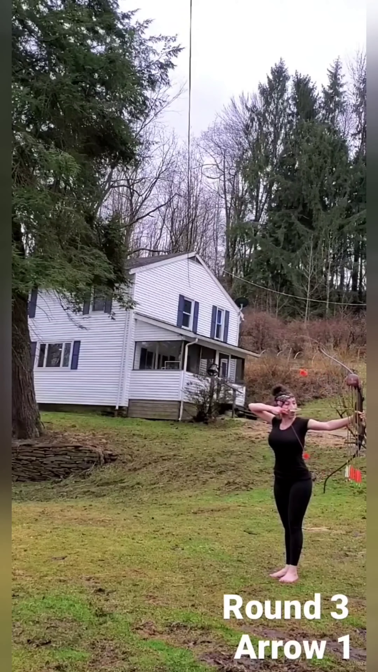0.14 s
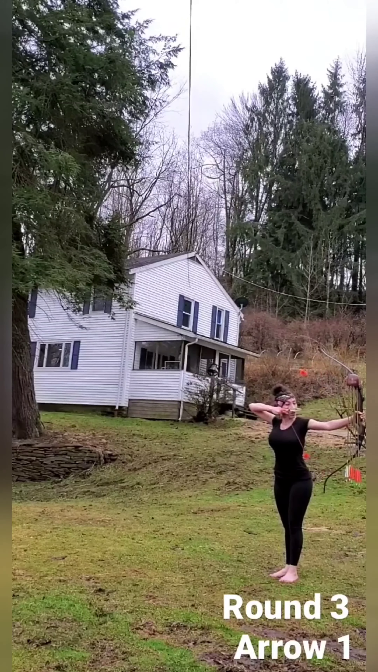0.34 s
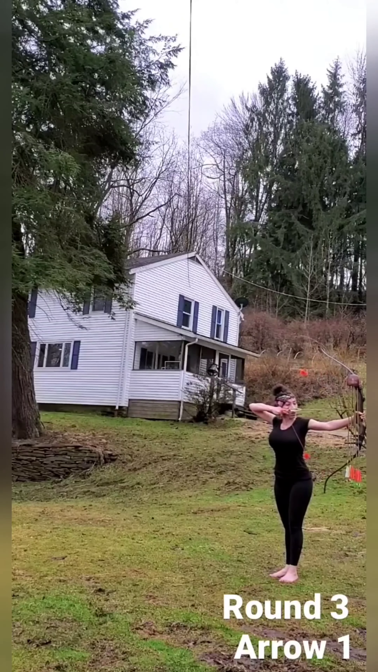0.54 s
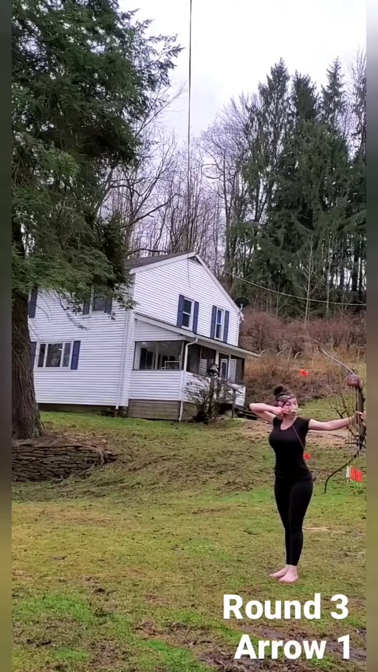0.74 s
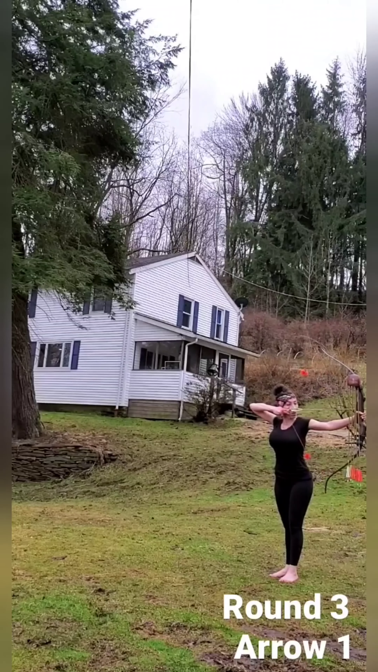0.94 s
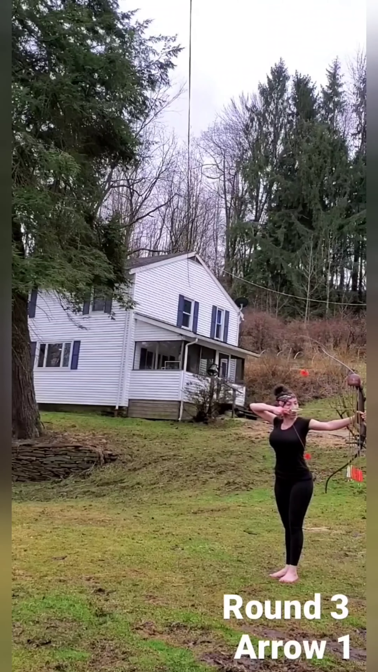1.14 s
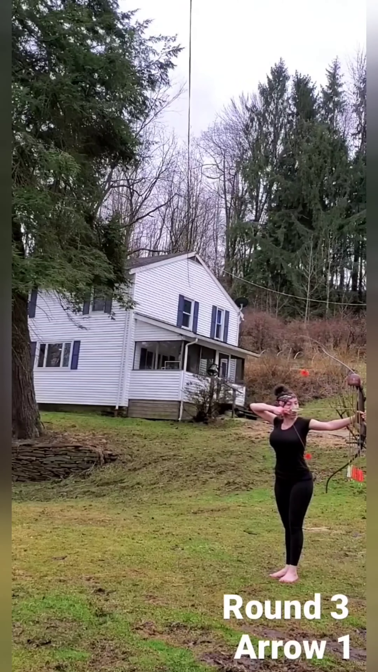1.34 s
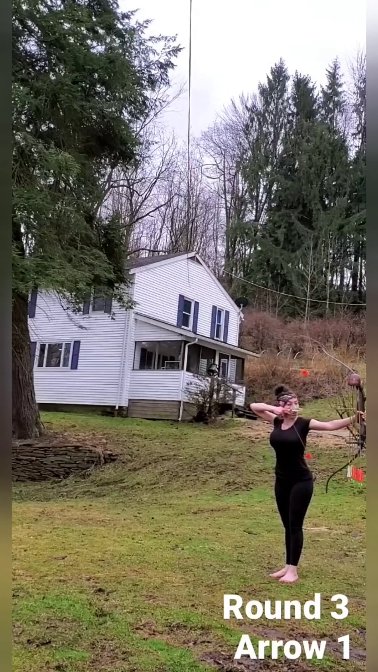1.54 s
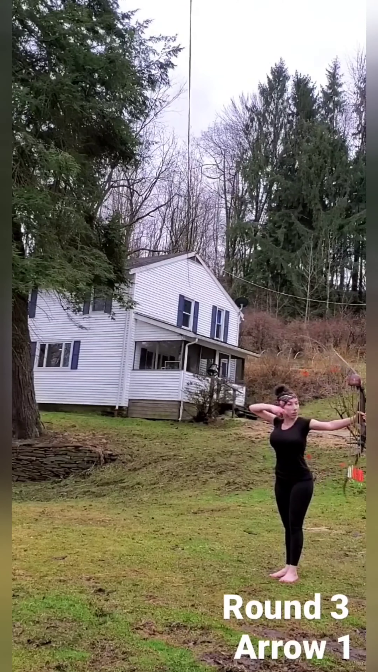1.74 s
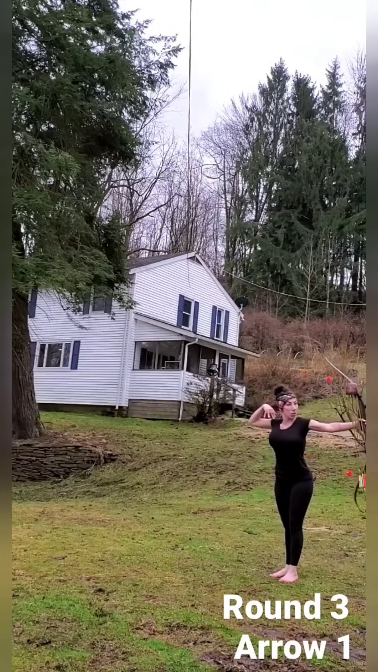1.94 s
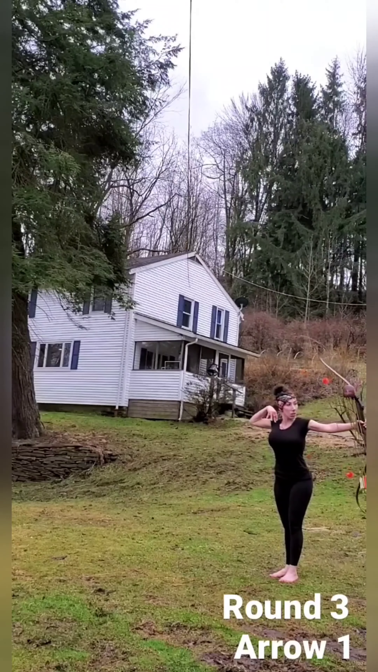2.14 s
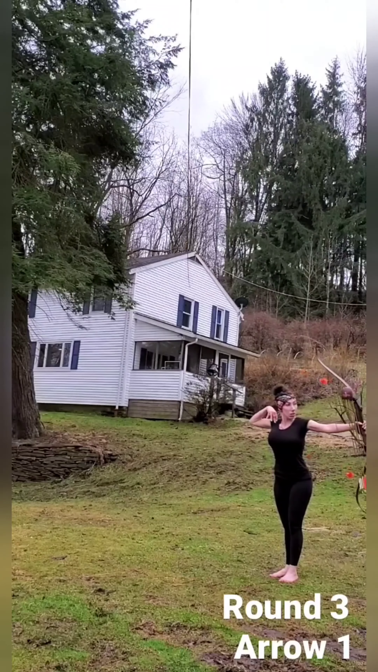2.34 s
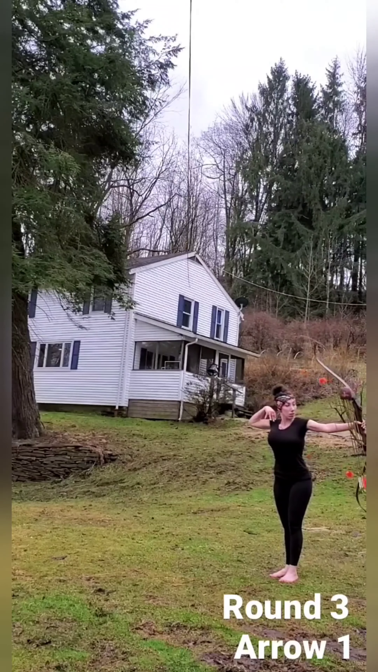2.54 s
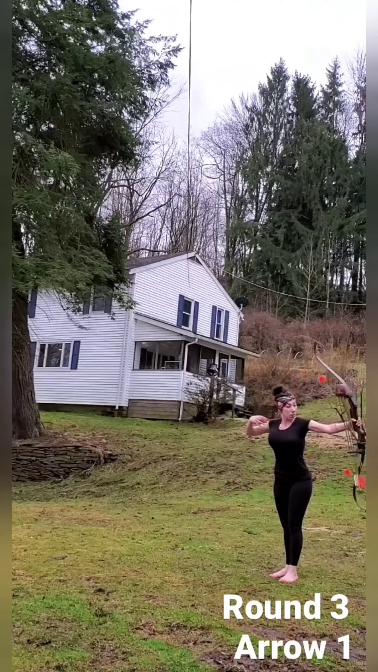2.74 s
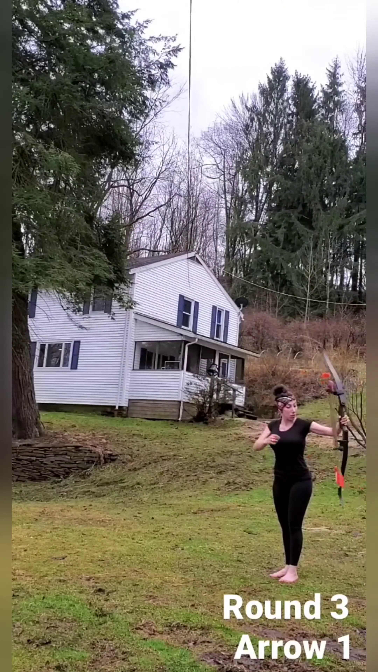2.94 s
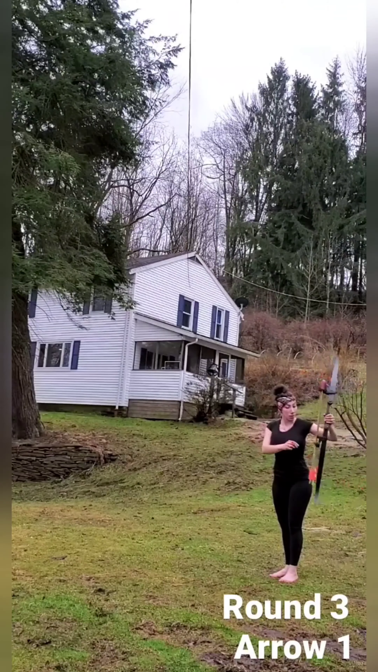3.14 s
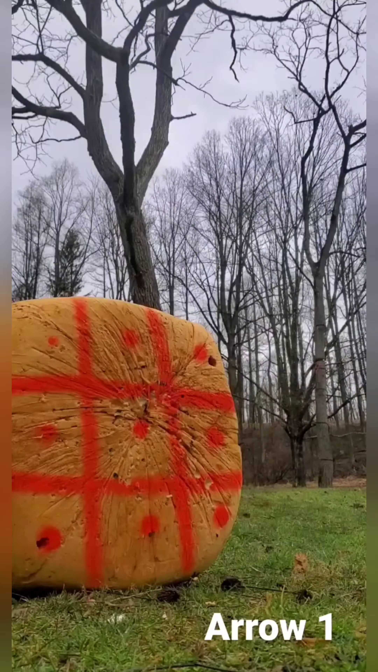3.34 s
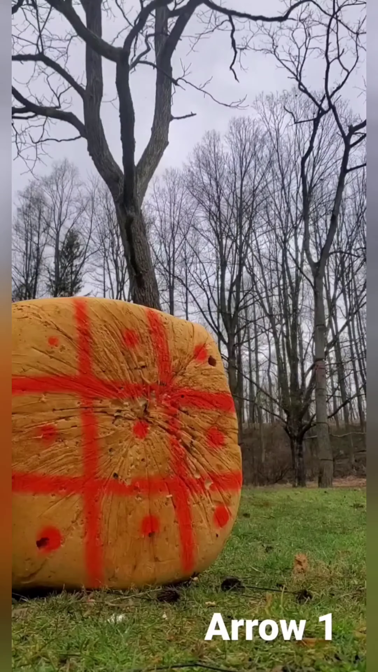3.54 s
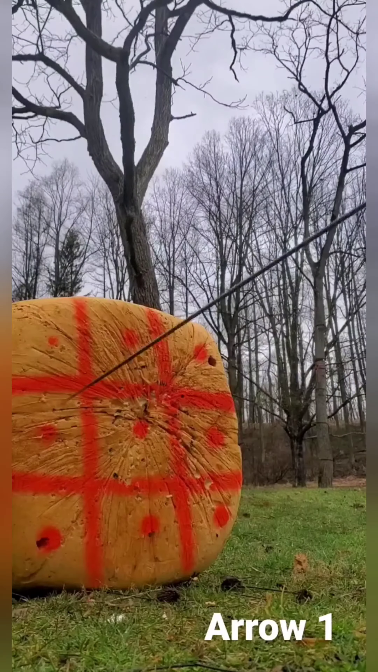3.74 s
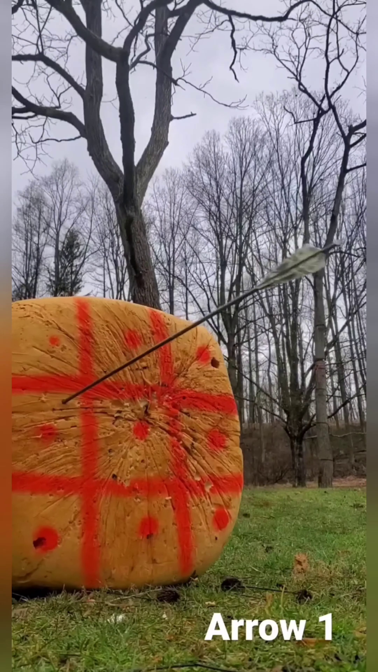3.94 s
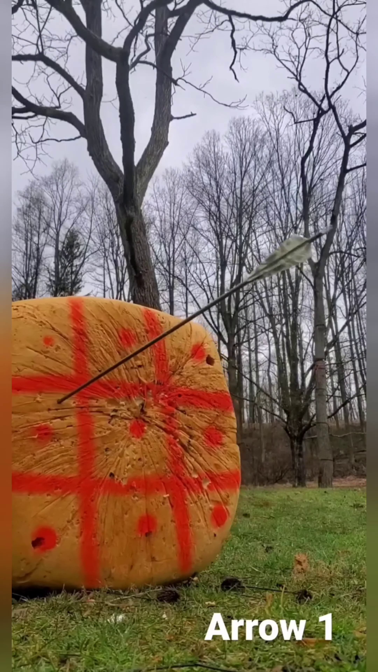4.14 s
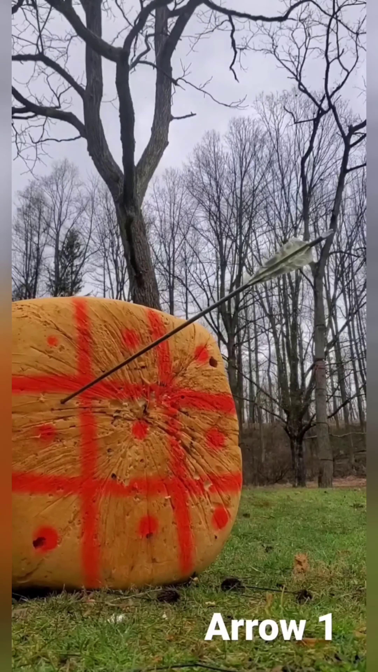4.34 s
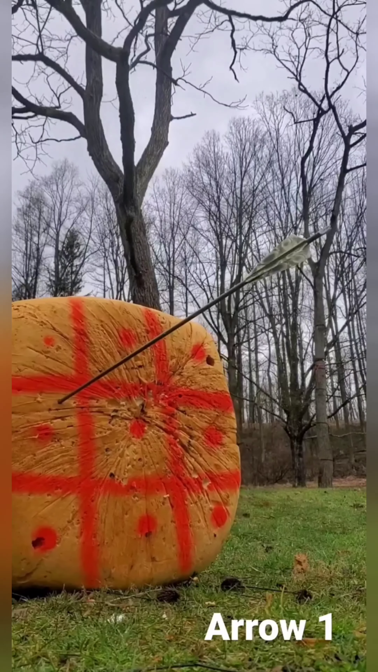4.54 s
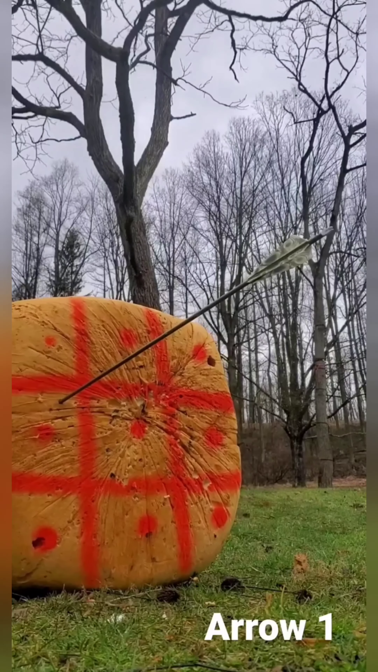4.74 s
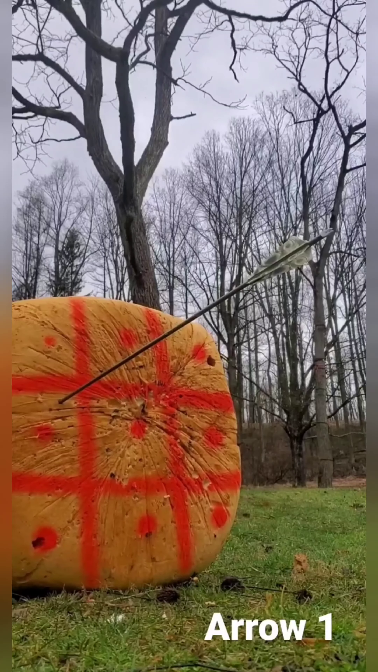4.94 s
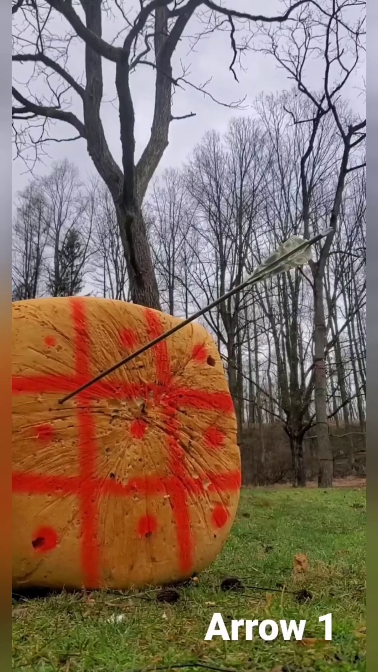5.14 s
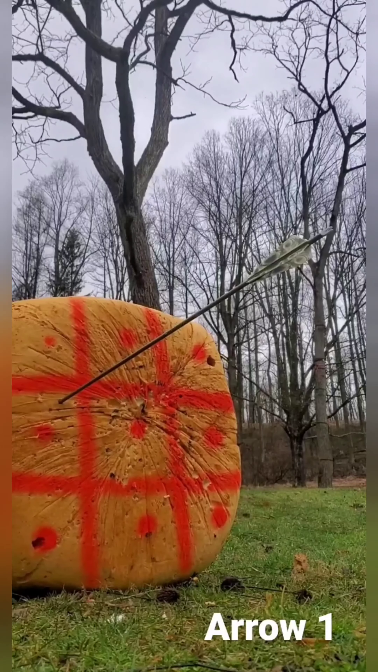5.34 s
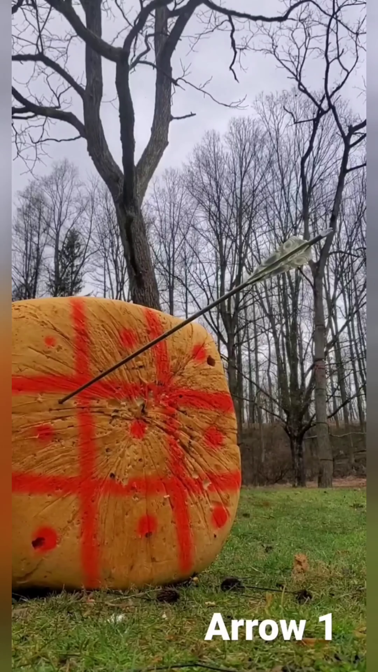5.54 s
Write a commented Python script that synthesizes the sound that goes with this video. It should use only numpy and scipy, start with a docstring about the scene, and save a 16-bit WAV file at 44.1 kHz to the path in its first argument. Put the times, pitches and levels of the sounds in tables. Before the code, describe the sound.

A quiet yard opens with low wind buffeting both sides, then mostly the right, strongest around 1.7 to 1.85 seconds. Faint, blurred bird calls fade in the first half second while a small whistled phrase with a higher flick repeats about four times a second until 1.3. At 1.81 a bowstring slaps twice, dry and woody, and the arrow hisses away with light rattling clicks around 2.0. A soft, dull foam thud lands at 2.32, with thin high chirps nearby. Wind swells on the left before a hard cut at 3.3 and a tiny silence. From 3.35 the sound is beside the target: a faint caw at 3.5, a sharp snap at 3.73, a very brief hiss, then a loud cracking thud at 3.84, tearing foam, left-heavy. A short boom and echoes die away under rumbling left-side wind, sparse ticks and faint leaves until about 5.7.

```python
"""A bow is shot: modes of bow and string ring, the arrow hisses off and thuds into a foam target.
After a hard cut and a short silence a second shot is heard from beside the target.
Blows drive decaying modes; slaps, tearing foam and moving air are shaped noise; sparse taps echo them.
Behind lie far birds made of blurred tones and a caw, stirring leaves and a steady yard murmur.
Wind noise buffets each microphone port on its own; the right port is duller and shaded."""
import sys
import numpy as np
from scipy import signal
from scipy.fft import rfft, irfft, next_fast_len
from scipy.io import wavfile
from scipy.ndimage import uniform_filter1d

SR = 44100
rng = np.random.default_rng(int(sys.argv[2]) if len(sys.argv) > 2 else 0)


def dump_mix(stems):
    """Bounce the given channels to the path in sys.argv[1] as a 16-bit WAV at rate SR."""
    frames = np.atleast_2d(stems).T  # one column per channel
    limited = np.clip(frames, -1, 1)  # hard clip at full scale
    pcm = np.round(limited * 32767).astype(np.int16)
    wavfile.write(sys.argv[1], SR, pcm)


N = 251369

# Source levels are those before the gain of record(). A "shade" is how many dB weaker the right port is,
# before its own colouring. A width in octaves runs from the centre to the -6 dB point on either side.

# Modes of the bow. Each row: frequency in Hz, level in dB, t60 in seconds.
BOW_MODES = [(149.8, -1, 0.31), (210.4, 4.5, 0.041), (393, -1, 0.073), (480, -7, 0.12), (694, -3, 0.084),
             (1330, -16.5, .12)]
# Modes of the target. Each row: frequency in Hz, level in dB, t60 in seconds.
TARGET_MODES = [(169, -5.5, 0.068), (216.1, -6, .24), (276.6, -8, 0.092), (358.4, -18.5, 0.28),
                (378.7, -0.5, 0.078), (446, -15.5, 0.14), (557, -15, 0.078), (574.7, 4, 0.035),
                (643, -17, 0.089), (780, -10.5, .02), (955, -2.5, 0.012), (1260, -17, 0.0085)]
# Modes of the arrow tip. Each row: frequency in Hz, level in dB, t60 in seconds.
TIP_MODES = [(600, -1, 0.024), (1223, -10, 0.015), (2876, -7, 0.005), (3940, 1.5, 0.005),
             (6260, -8.5, 0.0046), (10500, -13, 0.0067)]
# Pushes into the bow. Each row: time in seconds, level in dB, contact in ms, shade in dB.
BOW_PUSHES = [(1.8095, -42, 0.78, 1), (1.826, -35.5, 2.2, -6), (3.7205, -40, .6, 14.5),
              (3.7385, -29, 0.95, 13), (3.7445, -39, 1.9, 14)]
# Blows on the target. Each row: time in seconds, level in dB, contact in ms, shade in dB.
TARGET_BLOWS = [(2.3212, -25.5, 0.88, 7.3), (2.3275, -17.5, 3, 1.6), (2.3345, -21, 0.81, 2.8),
                (2.378, -28.5, 2.2, 2.3), (3.8382, -20, 0.17, 13), (3.8445, -24, 0.44, 18),
                (3.847, -24.5, 4, 10), (3.8497, -3, 0.58, 12.6), (3.8745, -20.5, 0.67, 8.3)]
# Blow on the arrow tip. Each row: time in seconds, level in dB, contact in ms, shade in dB.
TIP_BLOWS = [(3.8378, -8, 0.055, 16.5)]

# String slaps, two for each shot. Each row: time in seconds, knock level in dB, crack level in dB,
# crack centre in Hz, crack t60 in seconds, zing level in dB, shade in dB.
STRING_SLAPS = [(1.808, -39, -35.5, 2780, 0.086, -72, 0), (1.8246, -36.5, -26.5, 2820, 0.041, -36, 4),
                (3.7235, -39.5, -37.5, 2996, .025, -59.5, 12.5),
                (3.731, -45.5, -32.5, 3500, .05, -35.5, 12.5)]
# Bands of a slap: centre in Hz, width in octaves, t60 in seconds.
KNOCK, ZING = (480, 1.3, 0.071), (9700, 0.36, 0.029)
CRACK_OCTAVES = 0.85

# Air past the fletching, one list for each shot. Each row: time in seconds, level in dB, centre in Hz.
FLIGHT_PATHS = [
    [(1.83, -37, 2170), (1.88, -47.5, 2640), (1.978, -51, 3100), (1.995, -51.5, 3980), (2.045, -51.5, 3550),
     (2.11, -55.5, 3330), (2.17, -66, 3240), (2.32, -78, 4840)],
    [(3.74, -44.5, 3000), (3.8, -56, 4000), (3.825, -49.5, 5500), (3.838, -58, 4340)],
]
# Width of the hiss in octaves, one entry for each shot.
FLIGHT_WIDTHS = [0.81, 1.3]
# Shade of the hiss in dB, one entry for each shot.
FLIGHT_SHADES = [6, 11.5]
PATCHY_DB, RATTLE_DB = 3.5, 2.8  # rms spread over time and frequency, and over time alone

# Foam tearing round the tip. Each row: time in seconds, level in dB, centre in Hz, shade in dB.
FOAM_TEARS = [(2.321, -39.5, 1480, -2.5), (2.323, -42.5, 2200, -4.5), (2.322, -47.5, 6000, -4),
              (3.838, -21.5, 800, 6), (3.838, -21.5, 3080, 11), (3.842, -21, 3480, 10),
              (3.846, -31, 4000, 18), (3.848, -40, 6000, 6.5)]
TEAR_T60_S, TEAR_OCTAVES = 0.029, 0.73
# Small clicks, most from the rattling shaft. Each row: time in seconds, level in dB, centre in Hz,
# t60 in seconds, shade in dB.
SMALL_CLICKS = [(1.913, -56, 3000, .04, -21), (1.985, -43.5, 4600, 0.031, -11), (1.992, -38, 4700, .05, -3),
                (2.035, -45.5, 3060, 0.055, 8), (2.081, -56, 5500, .03, -2), (2.111, -57, 3040, .03, 8),
                (3.7515, -46, 6000, .015, 14.5), (3.774, -49.5, 3955, .025, 11.5),
                (3.79, -56, 4200, .02, 12), (3.878, -59, 6320, 0.011, 16),
                (3.906, -54.5, 4510, 0.019, 13.5), (3.975, -57, 2500, 0.028, 17.5),
                (4.259, -64, 1190, .03, 10.5), (5.192, -69, 3200, 0.022, 15.5),
                (5.607, -62.5, 4000, 0.11, 23.5)]
CLICK_OCTAVES = 0.47
# Rumble and hiss after each shot and hit. Each row: time in seconds, boom level in dB,
# middle level in dB, treble level in dB, top level in dB, shade in dB.
ROLL_LEVELS = [(1.83, -50, -45.5, -56.5, -56.5, 6), (2.335, -33.5, -57, -67.5, -70.5, 4.5),
               (3.735, -36.5, -57.5, -62.5, -61.5, 11.5), (3.865, -29.5, -54.5, -57, -66.5, 10.5)]
# Boom, middle, treble and top bands. Each row: centre in Hz, width in octaves, t60 in seconds.
ROLL_BANDS = [(233.5, 0.83, .4), (950, 0.88, .55), (2400, 1.0, .55), (9000, .45, .4)]
RAGGED_DB = 2.2  # rms wavering of every noise burst

# Decay of the echoes from trees and walls. Each row: frequency in Hz, t60 in seconds.
ECHO_DECAY = [(150, 0.99), (400, 0.2), (1000, 0.1), (2300, .7), (4000, 0.25), (8000, 0.53)]
THUD_ECHO_DB, CRACK_ECHO_DB, SONG_ECHO_DB = -22, -25.5, 1.5

# Far notes outside the phrase. Each row: start in seconds, length in seconds, first frequency in Hz,
# last frequency in Hz, level in dB, blur in Hz, shade in dB.
FAR_NOTES = [(1.129, 0.061, 5870, 6040, -70.5, 300, 3), (1.15, 0.12, 6260, 6130, -74, 150, 16),
             (2.244, 0.092, 10130, 10840, -78.5, 595, 2), (2.426, 0.088, 10300, 10520, -78, 880, 3),
             (2.505, 0.12, 10640, 10390, -75.5, 450, 2), (2.744, 0.092, 9440, 9450, -77.5, 795, 6),
             (5.2, 0.07, 3382, 3255, -87.5, 497.5, 9), (5.44, 0.063, 2262, 2074, -88, 300, 2.5)]
# One phrase repeated about four times a second. Each row: start in seconds, held length in seconds, level in dB.
PHRASES = [(0.172, 0.077, -83.5), (0.402, 0.1, -71), (0.643, .135, -74.5), (.9, 0.16, -71),
           (1.14, .17, -76)]
HELD_HZ, HELD_END_HZ, HELD_BLUR_HZ, HELD_SHADE_DB = 2120, 2220, 85, 14
# a higher flick starts part way through the held note: fraction of it, seconds, dB relative to it
FLICK_AT, FLICK_S, FLICK_DB = 0.52, 0.085, -7
FLICK_HZ, FLICK_END_HZ, FLICK_BLUR_HZ, FLICK_SHADE_DB = 2450, 2450, 220, 8
# Calls already dying away at the start. Each row: frequency in Hz, level in dB, blur in Hz, t60 in seconds.
FADING_CALLS = [(3920, -68, 260, 0.89), (2960, -73, 980, 0.47), (2180, -84.5, 250, 0.96)]
FADING_SHADE_DB = 2.5
# Path of the caw. Each row: time in seconds, fundamental in Hz, level in dB.
CAW_PATH = [(3.485, 498, -85.5), (3.504, 534, -80), (3.539, 538, -72.5), (3.565, 505, -75),
            (3.59, 462.5, -82.5)]
# Throat resonance of the caw. Each row: multiple of the fundamental, level in dB.
CAW_HARMONICS = [(2, -12), (4, -4.5), (5, 0.5), (6, -20)]

# Leaves stirring late on. Each row: time in seconds, level in dB.
LEAVES = [(5.05, -105), (5.3, -87), (5.6, -78), (5.7, -81.5)]
LEAVES_HZ, LEAVES_OCTAVES, LEAVES_SHADE_DB = 2000, 1.3, 4.5

# Spectrum of the buffeting, relative. Each row: frequency in Hz, level in dB per Hz.
BUFFET_SPECTRUM = [(15, -24), (28, -13.5), (45, -1), (65, 6), (95, -0.5), (150, -12.5), (300, -33.5),
                   (600, -48.5), (1500, -72.5), (6000, -84.5), (13000, -85.5)]
# Buffeting at the left port. Each row: time in seconds, level in dB.
LEFT_GUSTS = [(0, -33), (.06, -30.5), (.13, -34.5), (.24, -56), (.9, -56), (.97, -42), (1.05, -59),
              (1.35, -57), (1.9, -53), (2.6, -59), (3.08, -56), (3.13, -32), (3.3, -28), (3.36, -51.5),
              (3.53, -63), (3.6, -43.5), (3.68, -63), (3.84, -32.5), (4.0, -30.5), (4.5, -31), (4.7, -41.5),
              (4.86, -32.5), (4.93, -48), (5.06, -35), (5.48, -41.5), (5.6, -36.5), (5.7, -37)]
# Buffeting at the right port. Each row: time in seconds, level in dB.
RIGHT_GUSTS = [(0, -36.5), (0.059, -32.5), (.15, -43.5), (.22, -51.5), (.32, -49.5), (.95, -49),
               (1.02, -37), (1.2, -39.5), (1.29, -56.5), (1.36, -42.5), (1.6, -37.5), (1.711, -26.5),
               (1.78, -40), (1.839, -27), (2.04, -55.5), (2.17, -44.5), (2.25, -51.5), (2.4, -44.5),
               (2.6, -65), (3.3, -80), (3.6, -88), (3.85, -60), (4.5, -71.5), (4.9, -86), (5.6, -71)]

# Yard murmur and microphone hiss. Each row: frequency in Hz, left then right level near the archer,
# left then right level near the target, all in dB per Hz.
YARD_SPECTRA = [(39.4, -94.5, -84, -88, -99), (78.7, -80.5, -90.5, -81.5, -96.5),
                (158.1, -94.5, -91.5, -83, -103), (327.6, -90, -99, -88.5, -108),
                (650, -100, -107, -97, -113), (1080, -109, -114, -112, -114),
                (1610, -115, -118, -119, -115), (2700, -118, -120, -119, -122),
                (4480, -122, -123, -124, -125), (5718, -118, -125, -124, -127),
                (6050, -110, -127, -116, -129), (7100, -110, -129, -116, -130),
                (7050, -117, -129, -125, -130), (8600, -127, -130, -130, -131),
                (12930, -128, -130, -130, -131)]
# Likeness of the two ports. Each row: frequency in Hz, shared amplitude from 0 to 1.
LIKENESS = [(60, 0.34), (300, 0.98), (700, 0.19), (1500, 0), (4000, 0)]
# Colouring of the right port. Each row: frequency in Hz, gain in dB.
RIGHT_COLOUR = [(100, -3.5), (600, 3), (2000, -2), (4500, -9.5), (6300, -4.5), (7300, -17.5), (8500, -18.5),
                (9300, -4), (11000, 0), (13000, -3)]

CUT_S, RESUME_S = 3.301, 3.352
EDGE_HZ = 13300


def struck(blows, modes, swell_s):
    """Modal response: a push of finite contact excites decaying sines, a long one only the low modes."""
    out, t = np.zeros((2, N)), np.arange(SR // 2) / SR
    ring = np.zeros(len(t))
    for k, (hz, db, t60) in enumerate(modes):
        sign = (-1) ** k  # neighbours start in opposite directions
        ring += sign * gain_of(db - 60 * t / t60) * np.sin(2 * np.pi * hz * t)
    ring *= 1 - np.exp(-t / swell_s)
    push_s = np.arange(-200, 200) / SR
    for s, db, contact_ms, shade_db in blows:
        push = np.exp(-(push_s * 2000 / contact_ms) ** 2)
        pushed = signal.oaconvolve(ring, push / push.sum())
        add(out, s - 200 / SR, gain_of(db) * pushed, shade_db)
    return out


def string_slaps():
    """Impulsive excitation: each slap sums a low knock, a middle crack and a high zing of decaying noise."""
    out = np.zeros((2, N))
    for s, knock_db, crack_db, crack_hz, crack_t60, zing_db, shade_db in STRING_SLAPS:
        knock = burst(knock_db, *KNOCK)
        crack = burst(crack_db, crack_hz, CRACK_OCTAVES, crack_t60)
        zing = burst(zing_db, *ZING)
        add(out, s, knock + crack + zing, shade_db)
    return out


def flight():
    """Aerodynamic noise: hiss round a moving centre, patchy as the shaft wobbles and spins."""
    out, hz = np.zeros((2, N)), np.fft.rfftfreq(256, 1 / SR)[:, None]
    for rows, octaves, shade_db in zip(FLIGHT_PATHS, FLIGHT_WIDTHS, FLIGHT_SHADES):
        s, db, centre = np.transpose(rows)
        t = np.arange(s[0], s[-1], 64 / SR)
        a, b, c, d, patches = rng.standard_normal((len(t), len(hz), 5)).T
        patches = uniform_filter1d(uniform_filter1d(patches, size=3, axis=0), size=12, axis=1)
        patches_db = PATCHY_DB * evened(patches)
        rattle_db = RATTLE_DB * smooth(len(t), size=2)
        bell_db = -6 * (np.log2((hz + 1) / np.interp(t, s, centre)) / octaves) ** 2
        left = a + 1j * b
        right = 0.91 * left + 0.8 * (c + 1j * d)  # partly shared with the left
        spectra = np.array([left, right]) * gain_of(bell_db + patches_db + rattle_db)
        hiss = signal.istft(spectra, nperseg=256, noverlap=192)[1]
        level_db = np.interp(s[0] + np.arange(hiss.shape[1]) / SR, s, db)
        add(out, s[0], evened(hiss) * gain_of(level_db), shade_db)
    return out


def foam_tears():
    """Fracture noise: foam tearing round the tip gives short bursts of banded noise."""
    out = np.zeros((2, N))
    for s, db, hz, shade_db in FOAM_TEARS:
        add(out, s, burst(db, hz, TEAR_OCTAVES, TEAR_T60_S), shade_db)
    return out


def small_clicks():
    """Contact noise: each click is a narrow burst with its own centre and decay."""
    out = np.zeros((2, N))
    for s, db, hz, t60, shade_db in SMALL_CLICKS:
        add(out, s, burst(db, hz, CLICK_OCTAVES, t60), shade_db)
    return out


def rolls():
    """Diffuse decay: four bands of noise roll on after each shot and hit, each with its own t60."""
    out = np.zeros((2, N))
    for s, *levels_db, shade_db in ROLL_LEVELS:
        bands = [burst(db, *band) for db, band in zip(levels_db, ROLL_BANDS)]
        add(out, s, sum(bands), shade_db)
    return out


def echoes(x):
    """Scattering: convolution with sparse taps of random sign, each band dying at its own speed."""
    taps = np.zeros((2, SR // 2))
    at = np.arange(500, SR // 2 - 20, 20)
    at = at + rng.integers(0, 20, (2, len(at)))
    np.put_along_axis(taps, at, rng.choice([-1., 1.], at.shape), 1)
    hz, t, spectra = signal.stft(alike(*taps), SR, nperseg=256)
    decay = gain_of(-60 * t / read(ECHO_DECAY, hz)[:, None])
    tail = signal.istft(spectra * decay, SR, nperseg=256)[1]
    return signal.fftconvolve(x, tail / np.linalg.norm(tail[0]), axes=1)[:, :N]


def far_whistles():
    """Propagation blur: leaves and air spread the birds' gliding tones into narrow noise."""
    out, notes = np.zeros((2, N)), list(FAR_NOTES)
    for s, length, db in PHRASES:
        notes.append((s, length, HELD_HZ, HELD_END_HZ, db, HELD_BLUR_HZ, HELD_SHADE_DB))
        notes.append((s + FLICK_AT * length, FLICK_S, FLICK_HZ, FLICK_END_HZ, db + FLICK_DB,
                      FLICK_BLUR_HZ, FLICK_SHADE_DB))
    for s, length, first_hz, last_hz, db, blur_hz, shade_db in notes:
        note = whistle(length, first_hz, last_hz, blur_hz)
        growth = np.minimum(np.linspace(0.3, 1.8, len(note)), 1)
        swell = growth * signal.windows.tukey(len(note), 0.45)
        add(out, s, gain_of(db) * note * swell, shade_db)
    for hz, db, blur_hz, t60 in FADING_CALLS:
        note = whistle(0.68, hz, hz, blur_hz)
        add(out, 0, note * gain_of(db - 60 * np.arange(len(note)) / SR / t60), FADING_SHADE_DB)
    return out


def caw():
    """Harmonic source and throat: jittered harmonics, each wavering in level, make a hoarse call."""
    out = np.zeros((2, N))
    s, hz, db = np.transpose(CAW_PATH)
    t = np.arange(s[0], s[-1], 1 / SR)
    jitter = 1 + 0.02 * smooth(len(t), size=150)
    turns = np.cumsum(np.interp(t, s, hz) * jitter) / SR
    call = np.zeros(len(t))
    for multiple, throat_db in CAW_HARMONICS:
        waver_db = 2.4 * smooth(len(t), size=200)
        call += gain_of(throat_db + waver_db) * np.sin(2 * np.pi * round(multiple) * turns)
    add(out, s[0], call * gain_of(np.interp(t, s, db)), shade_db=10)
    return out


def rustle():
    """Many small contacts of leaves: a faint wide noise, independent in each port, grows late on."""
    s, db = np.transpose(LEAVES)
    t, out = np.arange(s[0], s[-1], 1 / SR), np.zeros((2, N))
    hiss = np.array([hump(len(t), LEAVES_HZ, LEAVES_OCTAVES) for port in (0, 1)])
    level_db = np.interp(t, s, db) + 1.5 * smooth(len(t), size=400)
    add(out, s[0], hiss * gain_of(level_db), LEAVES_SHADE_DB)
    return out


def wind():
    """Turbulent pressure: eddies roll over each port as low noise in lumps, unrelated left and right."""
    t = np.arange(N) / SR
    eddies = coloured(rng.standard_normal((2, N)), lambda f: read(BUFFET_SPECTRUM, f))
    # the slow drift of the noise is partly levelled, so that the gusts lead the loudness
    power = uniform_filter1d(uniform_filter1d(eddies ** 2, size=2200), size=2200)
    eddies /= np.sqrt(power) ** 0.27
    lumps_db = 3.0 * smooth((2, N), size=700)
    gusts_db = [np.interp(t, *np.transpose(port)) for port in (LEFT_GUSTS, RIGHT_GUSTS)]
    out = evened(eddies * gain_of(lumps_db)) * gain_of(gusts_db)
    # the last gust in the left port is in mid swing when the sound is cut
    swing = np.exp(-((t - CUT_S) / 0.003) ** 2)
    out[0] += swing * (gain_of(-29) - out[0])
    return out


def yard():
    """Stationary noise: a steady murmur and hiss, with another spectrum at the second listening place."""
    noise = alike(*rng.standard_normal((2, N))) * np.sqrt(SR / 2)  # unit power per Hz
    places = []
    for first_column in (1, 3):
        pair = [coloured(noise[k], lambda f: read(YARD_SPECTRA, f, axis=first_column + k)) for k in (0, 1)]
        places.append(pair)
    swell_db = 0.18 * smooth(N, size=3000)
    return np.where(np.arange(N) < CUT_S * SR, places[0], places[1]) * gain_of(swell_db)


def burst(db, hz, octaves, t60):
    """Exponential decay: banded noise starts fast and dies away; the ports share what LIKENESS sets."""
    t = np.arange(16000) / SR
    pair = alike(hump(len(t), hz, octaves), hump(len(t), hz, octaves))
    rise = 1 - np.exp(-t / (0.00049 + 0.74 / hz))  # the bass builds up more slowly
    ragged = gain_of(RAGGED_DB * smooth(len(t), size=max(round(20 * SR / hz), 2)))
    return pair * gain_of(db - 60 * t / t60) * rise * ragged


def whistle(length, first_hz, last_hz, blur_hz):
    """Random modulation: a gliding tone blurs into narrow noise; narrow notes keep a steadier core."""
    count = round(length * SR)
    a, b = smooth((2, count + 2000), size=max(round(SR / blur_hz / 2), 2))[:, :count]
    turn = np.exp(2j * np.pi * np.cumsum(np.linspace(first_hz, last_hz, count)) / SR)
    return evened(((45 / blur_hz + a + 1j * b) * turn).real)


def hump(count, hz, octaves):
    """Band noise: random samples under a bell-shaped spectrum on a log-frequency axis."""
    bell_db = lambda f: -6 * (np.log2((f + 1) / hz) / octaves) ** 2
    return evened(coloured(rng.standard_normal(count), bell_db))


def alike(a, b):
    """Partial coherence: the second channel shares a with the likeness of its band, the rest from b."""
    shared_db = lambda f: 20 * np.log10(np.clip(read(LIKENESS, f), 1e-3, 0.999))
    own_db = lambda f: 10 * np.log10(1 - gain_of(shared_db(f)) ** 2)
    return np.array([a, coloured(a, shared_db) + coloured(b, own_db)])


def smooth(shape, size):
    """Low-pass chance: twice-averaged noise gives slow wandering of rms 1."""
    noise = rng.standard_normal(shape)
    return evened(uniform_filter1d(uniform_filter1d(noise, size=size), size=size))


def coloured(x, db_of):
    """Linear filtering: applies a gain given in dB as a function of Hz."""
    size = next_fast_len(x.shape[-1])
    gain = gain_of(db_of(np.fft.rfftfreq(size, 1 / SR)))
    return irfft(rfft(x, size) * gain, size)[..., :x.shape[-1]]


def read(points, hz, axis=1):
    """Interpolation: one column of a spectrum, straight on a log-frequency axis."""
    table = np.transpose(points)
    return np.interp(np.log(hz + 1), np.log(table[0] + 1), table[axis])


def add(mix, s, sound, shade_db):
    """Superposition: places a sound, or a pair, in both ports, the right one weaker by shade_db."""
    part = mix[:, round(s * SR):][:, :sound.shape[-1]]
    part += sound[..., :part.shape[1]] * gain_of([[0], [-shade_db]])


def evened(x):
    """Normalisation: scales to rms 1."""
    return x / np.sqrt(np.mean(x ** 2) + 1e-20)


def gain_of(db):
    """Level law: decibels to amplitude."""
    return 10 ** (np.asarray(db) / 20)


def scene():
    """Superposition of all sources; the right port colours shots, hits, birds and their echoes."""
    thuds = struck(BOW_PUSHES, BOW_MODES, swell_s=0.00021) + struck(TARGET_BLOWS, TARGET_MODES, swell_s=0.0001)
    cracks = string_slaps() + foam_tears() + small_clicks() + rolls() + flight()
    song = far_whistles() + caw()
    to_echo = gain_of(THUD_ECHO_DB) * thuds + gain_of(CRACK_ECHO_DB) * cracks + gain_of(SONG_ECHO_DB) * song
    air = thuds + cracks + song + echoes(to_echo)
    air -= struck(TIP_BLOWS, TIP_MODES, swell_s=0.00005)  # the tip starts in the opposite direction
    air[1] = coloured(air[1], lambda f: read(RIGHT_COLOUR, f))
    return air + yard() + wind() + rustle()


def record(dry):
    """Gating, saturation and band limit: a hard cut, silence, a quick fade-in to +1 dB and a soft end."""
    t = np.arange(N) / SR
    rise_db = np.interp(t, [3.328, 3.33, 3.347, RESUME_S + 0.003], [-120, -48, -32, 1.0])
    cut = dry * np.where(t < CUT_S, 1, gain_of(rise_db))
    cut *= np.minimum((t[-1] - t) / 0.004, 1)
    ceiling = 0.93  # peaks bend softly towards this amplitude
    cut = cut / (1 + (cut / ceiling) ** 6) ** (1 / 6)
    low_pass = signal.firwin(511, EDGE_HZ, window=("kaiser", 9), fs=SR)
    return signal.oaconvolve(cut, low_pass[None], "same")


dry = scene()
out = record(dry)
dump_mix(out)
```